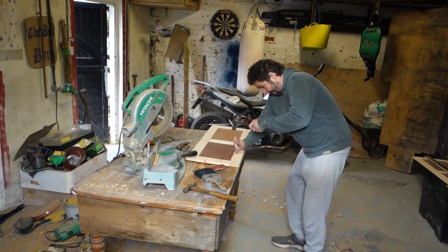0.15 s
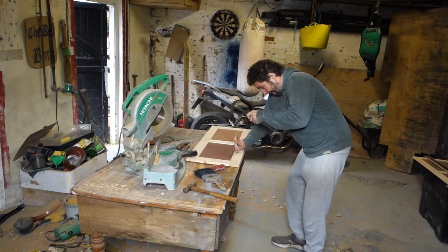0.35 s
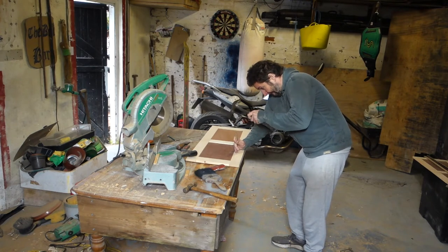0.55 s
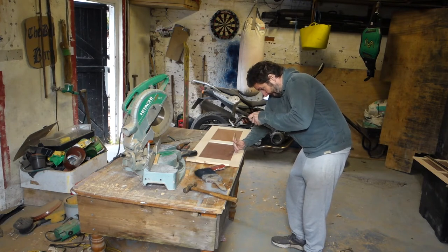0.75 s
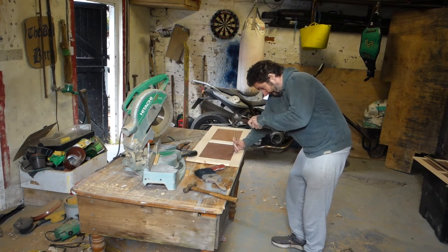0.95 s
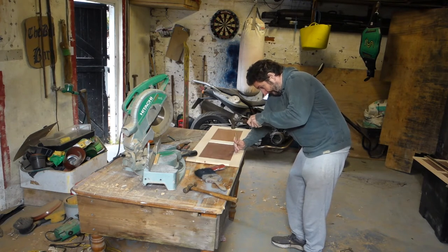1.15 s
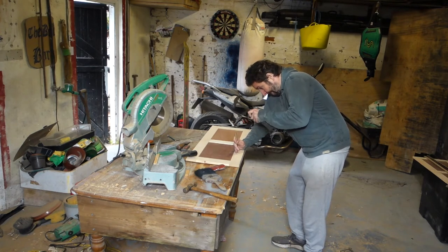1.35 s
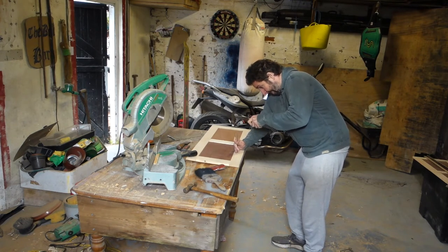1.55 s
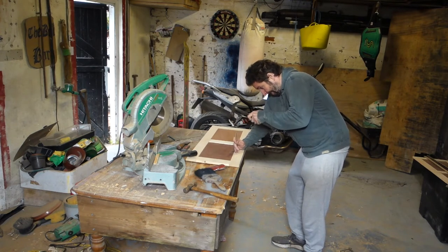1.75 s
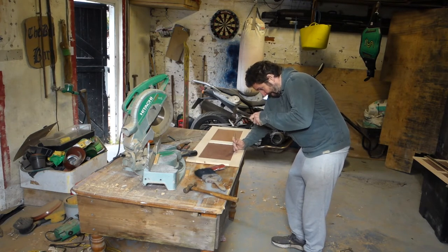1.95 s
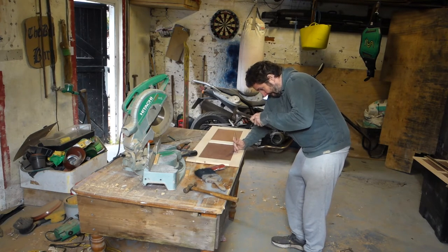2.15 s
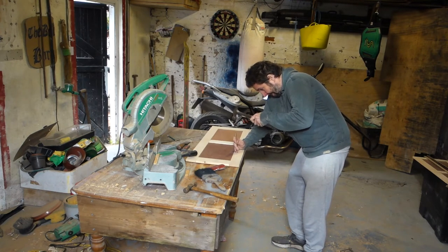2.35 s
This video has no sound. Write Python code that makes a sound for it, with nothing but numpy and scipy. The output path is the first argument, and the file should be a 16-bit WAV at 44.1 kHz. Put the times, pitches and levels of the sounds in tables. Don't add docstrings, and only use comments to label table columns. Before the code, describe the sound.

A hammer hits a steel punch on a wooden door: a firm blow, a pause, a duller light tap, then quickly the hardest, brightest blow. A hard-walled garage rings briefly; a small recorder squashes each hit.

```python
import sys
import numpy as np
from scipy import signal
from scipy.io import wavfile

SR = 44100
rng = np.random.default_rng(int(sys.argv[2]) if len(sys.argv) > 2 else 0)


def ratio_of_db(decibels):
    return 10 ** (np.asarray(decibels, float) / 20)


def transcribe(u):
    v = np.clip(np.atleast_2d(u).T, -1, 1)
    q = np.round(v * 32767).astype(np.int16)
    wavfile.write(sys.argv[1], SR, q)


N = 105840

BLOW_TIMES = [
    .1256,
    1.0398,
    1.472,
]
# (strength [dB], brightness [dB per octave], steel ring [dB], gain ducked by [dB])
BLOW_FORCES = [
    (6, 0.78, 0.5, 24.5),
    (-7, -1, 0, 16),
    (9, 1.36, 0.5, 29.5),
]
BLOWS = [(s, *force) for s, force in zip(BLOW_TIMES, BLOW_FORCES)]
# (frequency [Hz], t60 [s])
ROOM_DECAY = [(40, 0.52), (100, 0.51), (250, .36), (700, 0.37), (2000, 0.36), (4500, 0.25), (7500, 0.19),
              (11000, 0.17)]


def rms_one(x):
    return x / np.sqrt(np.mean(x ** 2) + 1e-20)


def at_hz(points, hz):
    table_hz, values = np.array(points).T
    return np.interp(np.log(hz), np.log(table_hz), values)


def since(s):
    return np.maximum(np.arange(N) / SR - s, 0)


def swell(s, build_s, t60):
    t = since(s)
    build = 1 - np.exp(-t / max(build_s, 1e-4))
    return build * ratio_of_db(-60 * t / t60)


def drift(rate_hz):
    r = np.exp(-80 * np.pi * rate_hz / SR)
    noise = rng.standard_normal(N // 40 + 2002)
    slow = signal.lfilter([1], [1, -2 * r, r * r], noise)[2000:]
    return np.interp(np.arange(N) / 40, np.arange(len(slow)), rms_one(slow))


def stereo(pair, hz):
    # (frequency [Hz], left-right likeness [0..1])
    likeness = [(40, .96), (90, .99), (170, .985), (490, .9), (1400, .7), (2500, .72), (4300, .01),
                (7000, .2), (11400, .01)]
    # (frequency [Hz], left minus right [dB])
    side_lean = [(60, .1), (220, .4), (830, 1.8), (2500, .8), (4500, -3), (11400, -2)]
    alike = np.clip(at_hz(likeness, hz), 0, 1)
    half_lean = at_hz(side_lean, hz) / 2
    middle = np.sqrt(1 + alike) * pair[0]
    side = np.sqrt(1 - alike) * pair[1]
    return (middle + side * [[1], [-1]]) * ratio_of_db([[half_lean], [-half_lean]])


def bands(spectrum, shape):
    out, power = 0, 0
    edges = 28 * 2 ** np.arange(0, 8.8, 1 / 3)
    white = rng.standard_normal((2, 2, N))
    for k, (low, high) in enumerate(zip(edges, edges[1:])):
        hz = np.sqrt(low * high)
        band = signal.butter(2, [low, high], "band", fs=SR, output="sos")
        pair = signal.sosfilt(band, white[k % 2])
        gain = ratio_of_db(at_hz(spectrum, hz))
        out = out + gain * shape(hz) * stereo(pair, hz)
        power = power + 4 * gain ** 2 * (high - low) / SR
    return out / np.sqrt(power)


def hollow(hz, width_hz):
    r = np.exp(-np.pi * width_hz / SR)
    poles = [1, -2 * r * np.cos(2 * np.pi * hz / SR), r * r]
    pair = signal.lfilter([1, 0, -1], poles, rng.standard_normal((2, N)))
    return rms_one(stereo(pair, hz))


def hum_and_hiss():
    # (frequency [Hz], density [dB per Hz])
    floor_spectrum = [(15, -20), (30, -7.5), (60, -1.5), (110, -1), (170, -14.5), (400, -10), (700, -13.5),
                      (1480, -22.5), (3000, -28.5), (10100, -32), (11500, -34)]
    return ratio_of_db(-69) * bands(floor_spectrum, lambda hz: ratio_of_db(1.0 * drift(12)))


def scuffs():
    # (time [s], level [dB], build-up [s], t60 [s], shrillness [dB])
    moves = [
        (-.03, -47.5, 0.011, 0.88, 7.5),
        (0.579, -55.5, .05, 0.78, -13),
        (.72, -65, .05, .8, -7.5),
        (1.95, -71, .07, 0.73, 12),
        (2.26, -74, .05, 0.51, -2),
    ]
    # (frequency [Hz], width [Hz], level [dB], share of shrillness)
    peaks = [(180, 120, -14, 1.2), (450, 100, -4, .01), (720, 150, -6, -.3), (1000, 200, -9, .3),
             (1700, 120, -12, .01), (2250, 200, -19, .9), (2560, 100, -13, .99), (5200, 1500, -27, .99)]
    out = 0
    for hz, width_hz, level_db, share in peaks:
        envelope = 0
        for s, db, build_s, t60, shrill_db in moves:
            envelope = envelope + ratio_of_db(db + level_db + share * shrill_db) * swell(s, build_s, t60)
        out = out + hollow(hz, width_hz) * envelope
    return out


def thump():
    start_s, pitch_hz, level_db, build_s, t60_s = .009, 104, -20.5, .04, .17
    tone = np.sin(2 * np.pi * pitch_hz * since(start_s))
    return ratio_of_db(level_db) * swell(start_s, build_s, t60_s) * tone


def knock():
    # (frequency [Hz], density [dB per Hz])
    knock_spectrum = [(25, -28.5), (50, -27), (90, -8.5), (362, -3), (800, -6), (1700, -12), (2650, -18),
                      (3300, -29), (5000, -33), (8800, -37.5), (11500, -40)]
    # (frequency [Hz], build-up [s])
    room_build = [(60, 0.0035), (500, 0.0037), (2000, 0.00058), (11000, 0.00074)]

    def envelope(hz):
        out = 0
        for s, db, tilt, _, _ in BLOWS:
            level_db = db + tilt * np.log2(hz / 1000)
            out = out + ratio_of_db(level_db) * swell(s, at_hz(room_build, hz), at_hz(ROOM_DECAY, hz))
        return out

    return bands(knock_spectrum, envelope)


def crack():
    low_hz, crack_db, build_s, t60_s = 4000, -21.5, .0007, .04
    treble = signal.butter(2, low_hz, "high", fs=SR, output="sos")
    bright = signal.sosfilt(treble, rng.standard_normal((2, N)))
    envelope = sum(ratio_of_db(db + crack_db) * swell(s, build_s, t60_s) for s, db, *_ in BLOWS)
    return stereo(bright, 2 * low_hz) * envelope


def steel():
    # (frequency [Hz], width [Hz], level on blow 1, 2, 3 [dB])
    steel_bands = [(2096, 260, -21, -13.5, -25), (2415, 40, -17, -13, -25.5), (3186, 52, -32.5, -29, -27.5),
                   (3965, 69, -36.5, -26.5, -25), (4280, 120, -29.5, -27.5, -33),
                   (5450, 200, -26.5, -25, -25.5), (6260, 150, -45, -26, -24), (7080, 150, -28.5, -46, -36),
                   (7855, 310, -32, -43, -31), (9200, 580, -37.5, -42.5, -26), (9800, 83, -24, -25.5, -24)]
    linger = 0.94
    flash_db, flash_t60_s = 3, 0.054
    out = 0
    for hz, width_hz, *levels in steel_bands:
        envelope = 0
        for (s, db, _, ring_db, _), level_db in zip(BLOWS, levels):
            ring = swell(s, 0.0002, linger * at_hz(ROOM_DECAY, hz))
            flash = ratio_of_db(flash_db) * swell(s, .0006, flash_t60_s)
            envelope = envelope + ratio_of_db(db + ring_db + level_db) * (ring + flash)
        out = out + hollow(hz, width_hz) * envelope
    return out


def wood():
    # (frequency [Hz], width [Hz], level on blow 1, 2, 3 [dB])
    resonances = [(220.6, 8.3, -19, -13, -23), (302, 18, -18, -18, -18.5), (388.8, 6.7, -24, -15.5, -25),
                  (538.8, 6, -13, -8, -12.5), (662, 8.3, -21.5, -24, -18.5), (732.4, 45, -22.5, -18.5, -12),
                  (938, 10, -18, -20.5, -15.5), (1170, 15, -23, -29, -41), (1273, 15, -18.5, -36, -18),
                  (1542, 18, -24.5, -29, -22.5), (1628, 18, -27, -24.5, -17.5)]
    build_s = 0.016
    out = 0
    for hz, width_hz, *levels in resonances:
        envelope = 0
        for (s, db, *_), level_db in zip(BLOWS, levels):
            envelope = envelope + ratio_of_db(db + level_db) * swell(s, build_s, at_hz(ROOM_DECAY, hz))
        out = out + hollow(hz, width_hz) * envelope
    return out


def boom():
    # (frequency [Hz], level [dB], t60 [s])
    modes = [(91, -15, 0.38), (99.1, -29, 0.89), (114, -23.5, 0.61), (155.9, -17.5, 0.15)]
    build_s, spread_db, waver_db, waver_hz = .018, 0.3, 6.5, 8.5
    chance = rng.uniform(-1, 1, (len(BLOWS), len(modes)))
    out = 0
    for (s, db, *_), row in zip(BLOWS, chance):
        for k, ((hz, mode_db, t60), luck) in enumerate(zip(modes, row)):
            level_db = db + mode_db + spread_db * luck + waver_db * drift(waver_hz)
            tone = (-1) ** k * np.sin(2 * np.pi * hz * since(s))
            out = out + ratio_of_db(level_db) * swell(s, build_s, t60) * tone
    return out


def after_ring():
    # (frequency [Hz], width [Hz], t60 [s], level on blow 1, 2, 3 [dB])
    loose_metal = [(98, 6, 1.1, -50, -40.5, -50.5), (111, 11, 1.6, -47.5, -34, -56),
                   (210, 12, 1.6, -62.5, -58, -59.5), (280, 14, 1.2, -65, -61, -65.5),
                   (371.7, 8, 1.8, -60.5, -57.5, -60), (470, 14, 1.2, -64.5, -60.5, -68.5),
                   (565, 6.4, 0.48, -52, -33.5, -54), (808, 10, 1.3, -65.5, -58, -58.5),
                   (1042, 13, 1.9, -71.5, -65.5, -71), (1660, 40, 1.8, -71, -65, -71),
                   (2560, 3, 0.92, -56, -62, -66)]
    out = 0
    for hz, width_hz, t60, *levels in loose_metal:
        envelope = 0
        for (s, db, *_), level_db in zip(BLOWS, levels):
            envelope = envelope + ratio_of_db(db + level_db) * swell(s, .05, t60)
        out = out + hollow(hz, width_hz) * envelope
    return out


def scene():
    quiet = hum_and_hiss() + scuffs() + thump()
    blows = knock() + crack() + steel() + wood() + boom() + after_ring()
    return quiet + blows


def low_pass(x):
    return signal.sosfilt(signal.butter(12, 11970, fs=SR, output="sos"), x)


def record(dry):
    recover_db_per_s, knee_s, grab_s = 211, .018, 0.00036
    duck_db = 0
    for s, *_, depth_db in BLOWS:
        knees_left = (depth_db / recover_db_per_s - since(s)) / knee_s
        climb_db = recover_db_per_s * knee_s * np.logaddexp(0, knees_left)
        grab = 1 - np.exp(-since(s) / grab_s)
        duck_db = duck_db + grab * climb_db
    top_cut = signal.cheby2(12, 30, 11200, fs=SR, output="sos")
    return low_pass(signal.sosfilt(top_cut, dry * ratio_of_db(-duck_db)))


dry = scene()
out = record(dry)
transcribe(out)
```